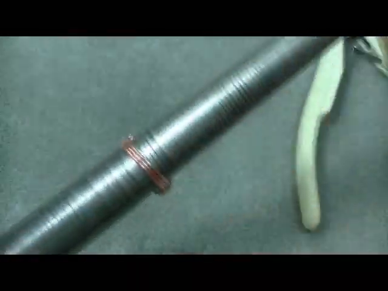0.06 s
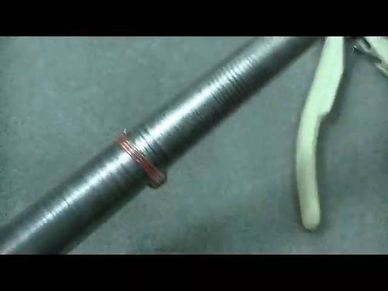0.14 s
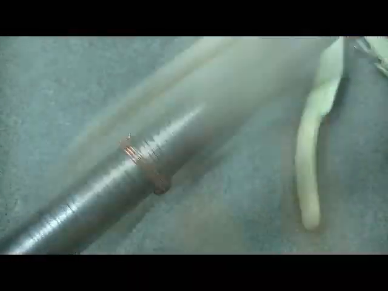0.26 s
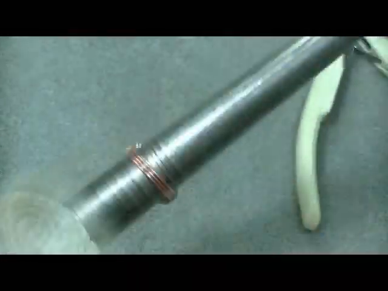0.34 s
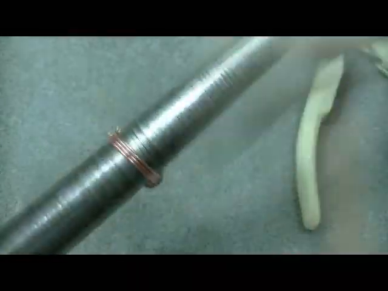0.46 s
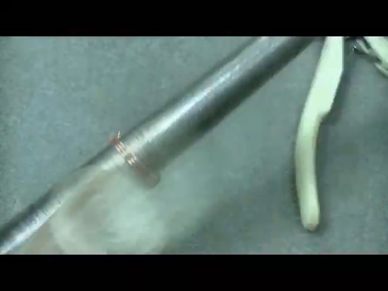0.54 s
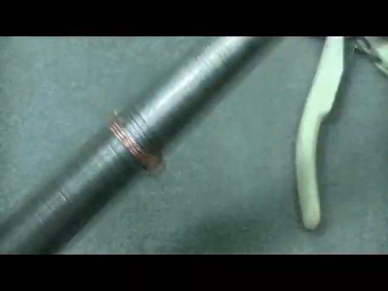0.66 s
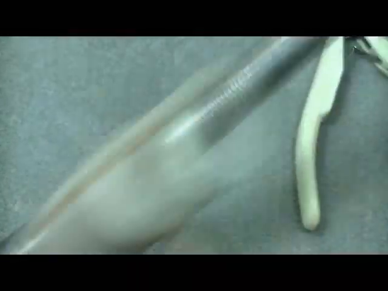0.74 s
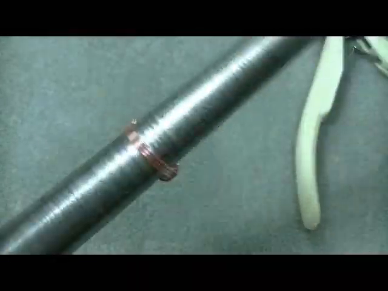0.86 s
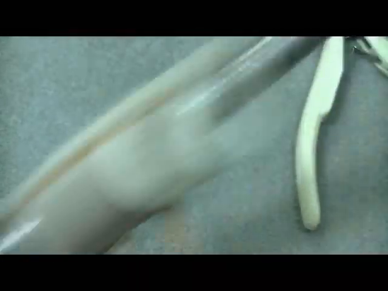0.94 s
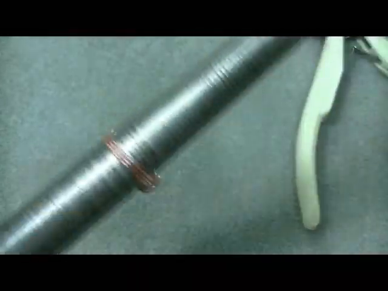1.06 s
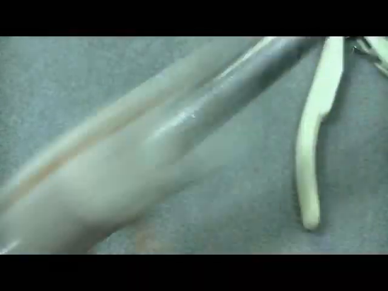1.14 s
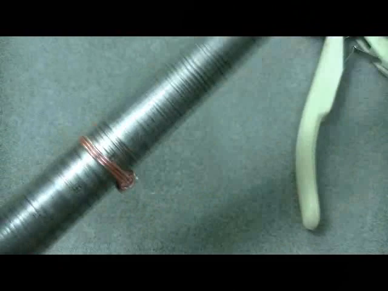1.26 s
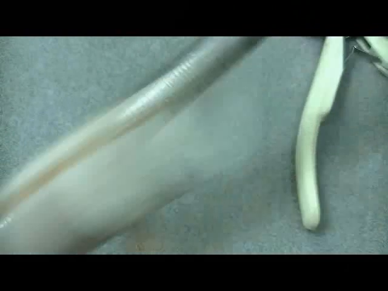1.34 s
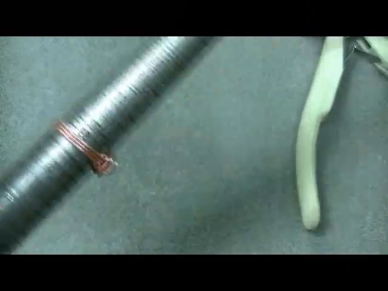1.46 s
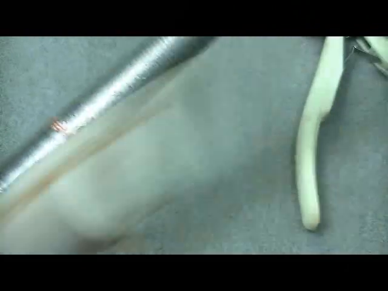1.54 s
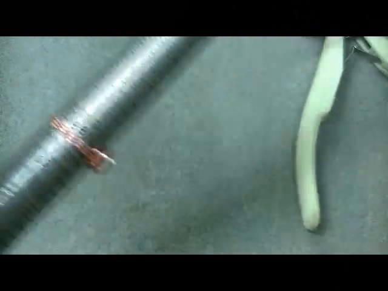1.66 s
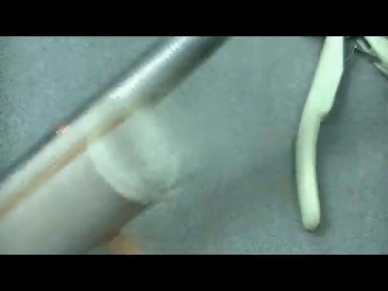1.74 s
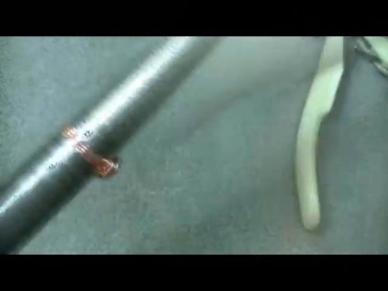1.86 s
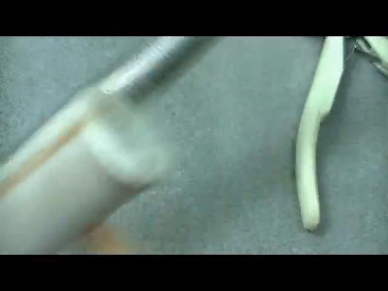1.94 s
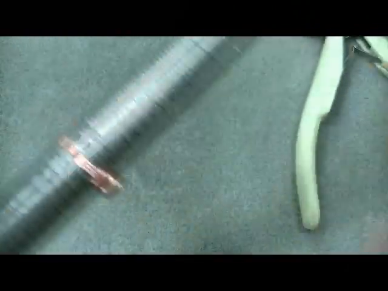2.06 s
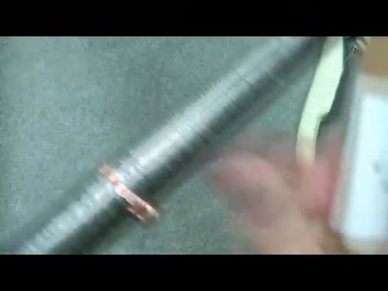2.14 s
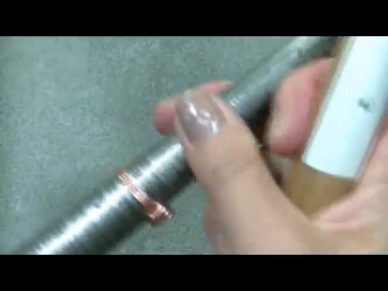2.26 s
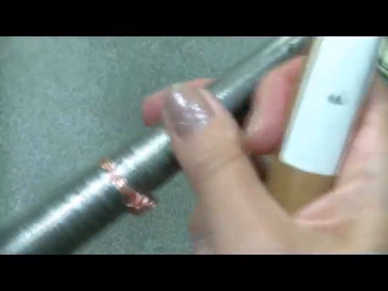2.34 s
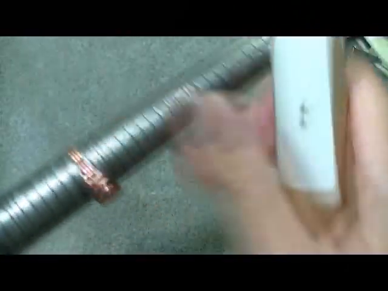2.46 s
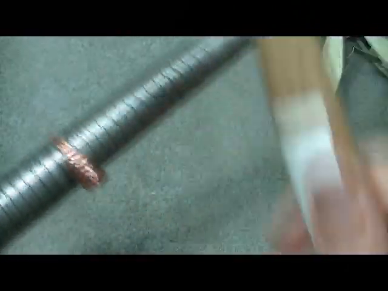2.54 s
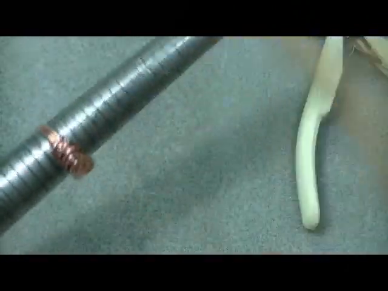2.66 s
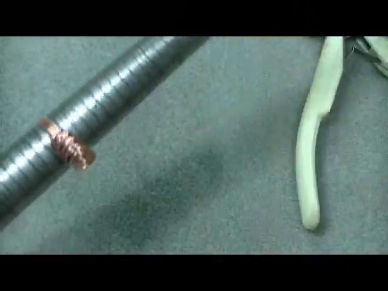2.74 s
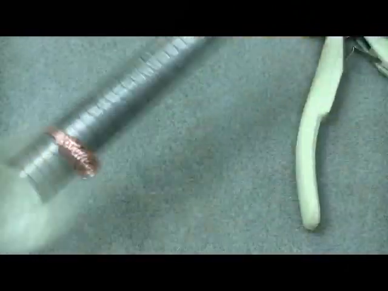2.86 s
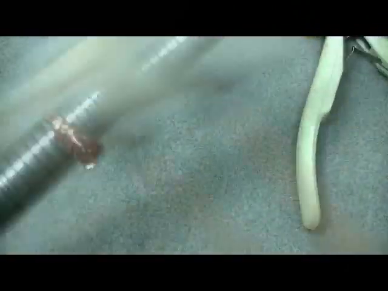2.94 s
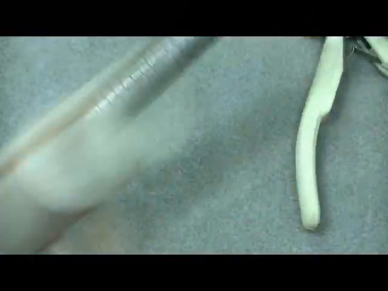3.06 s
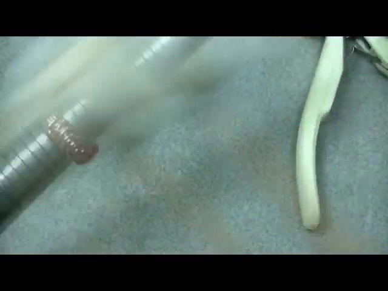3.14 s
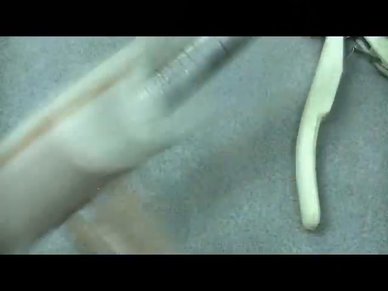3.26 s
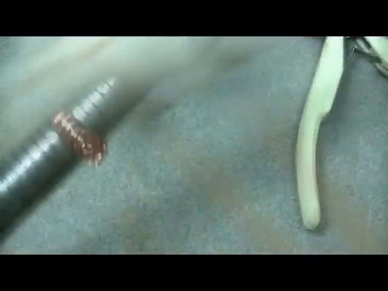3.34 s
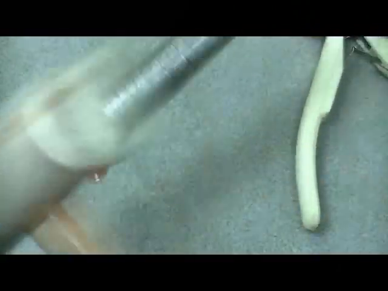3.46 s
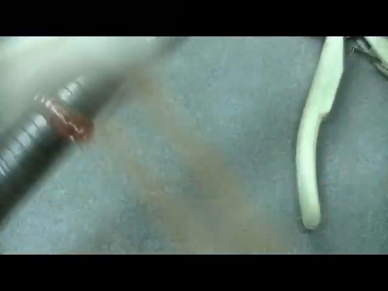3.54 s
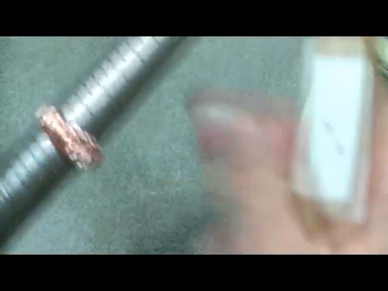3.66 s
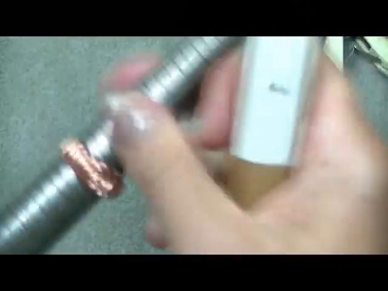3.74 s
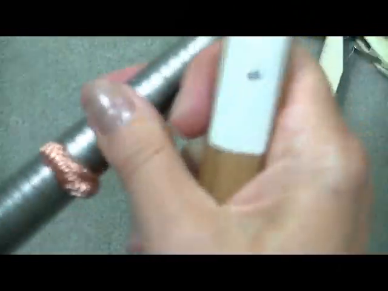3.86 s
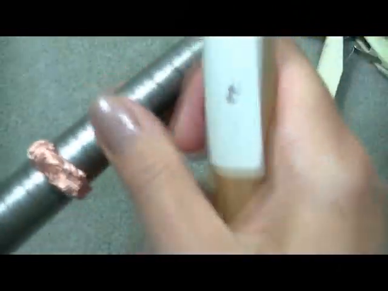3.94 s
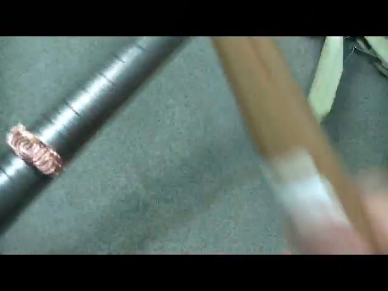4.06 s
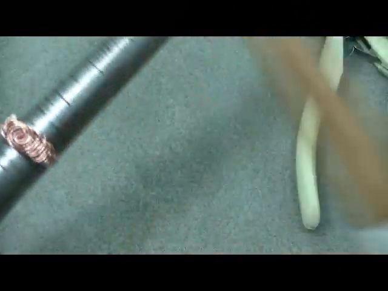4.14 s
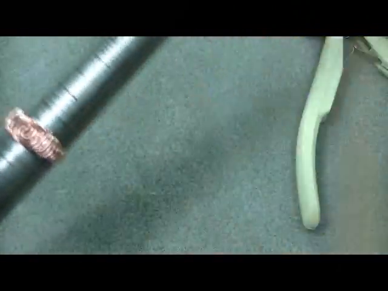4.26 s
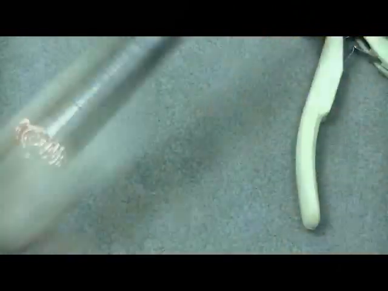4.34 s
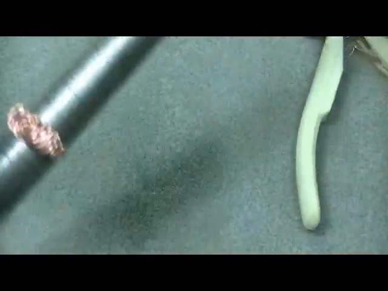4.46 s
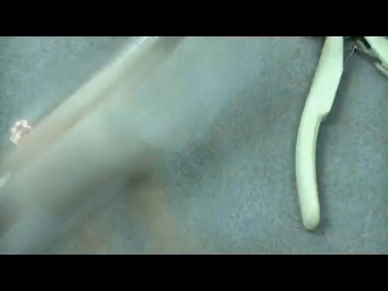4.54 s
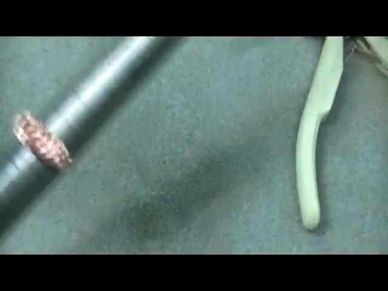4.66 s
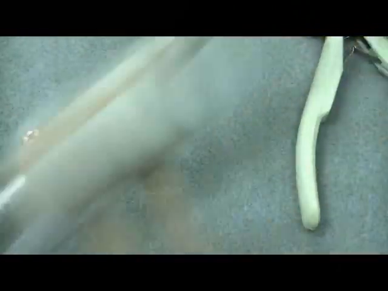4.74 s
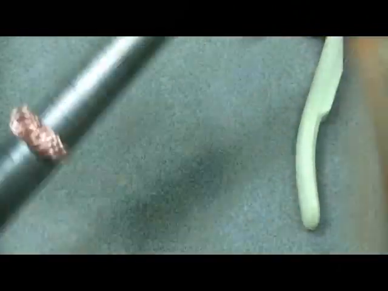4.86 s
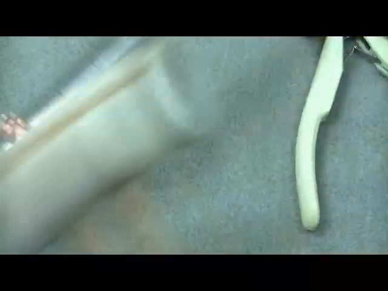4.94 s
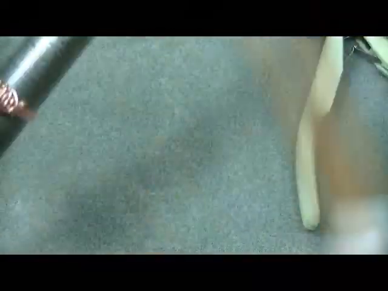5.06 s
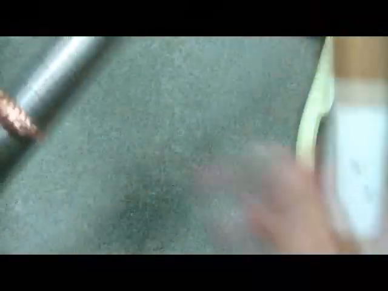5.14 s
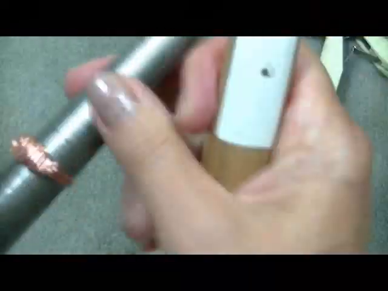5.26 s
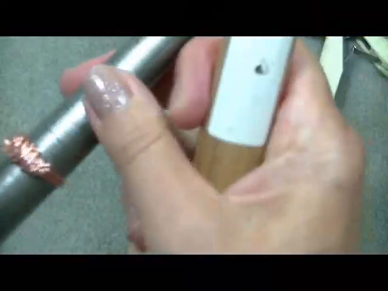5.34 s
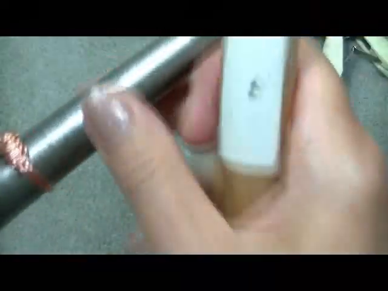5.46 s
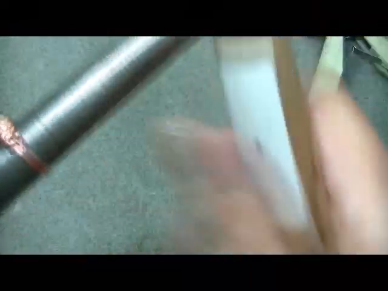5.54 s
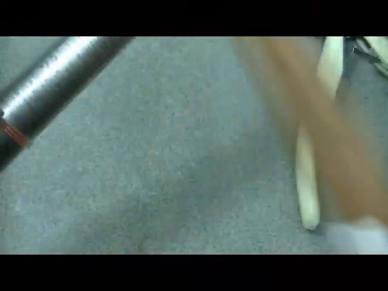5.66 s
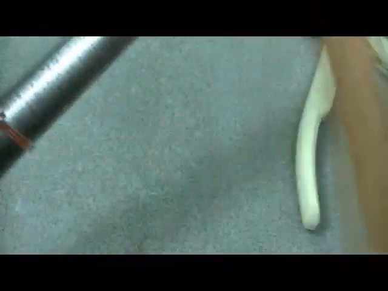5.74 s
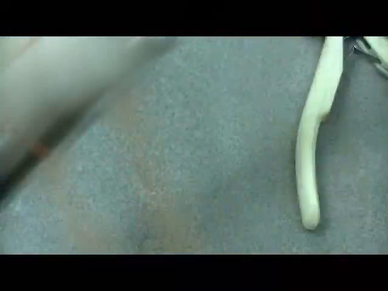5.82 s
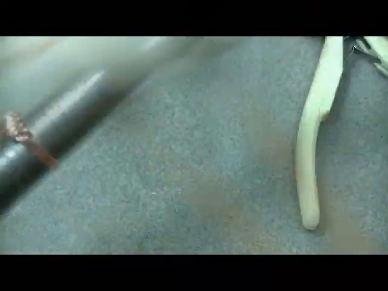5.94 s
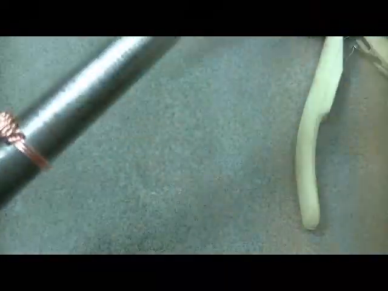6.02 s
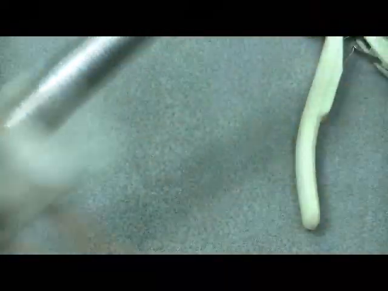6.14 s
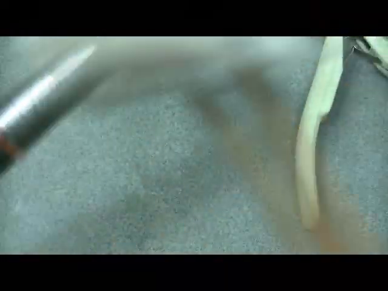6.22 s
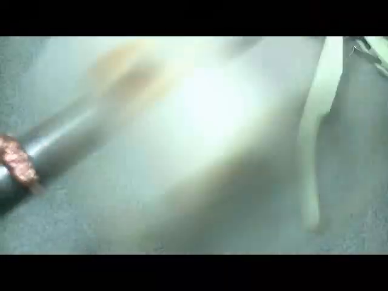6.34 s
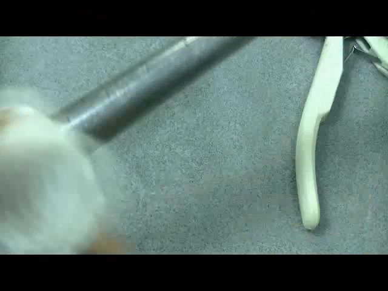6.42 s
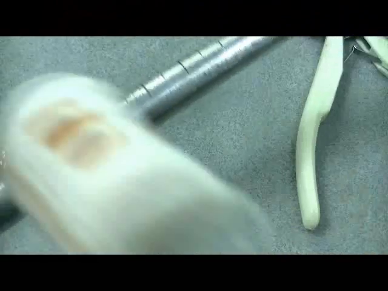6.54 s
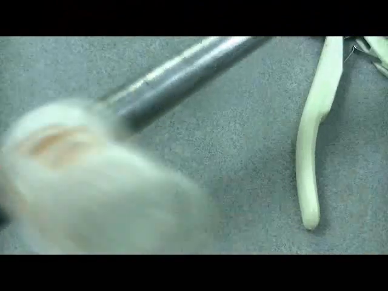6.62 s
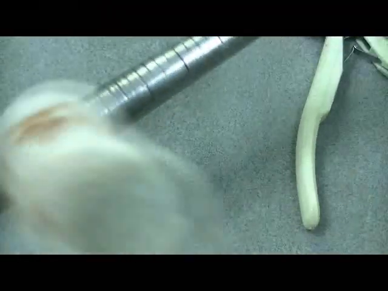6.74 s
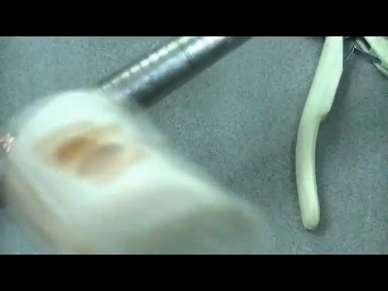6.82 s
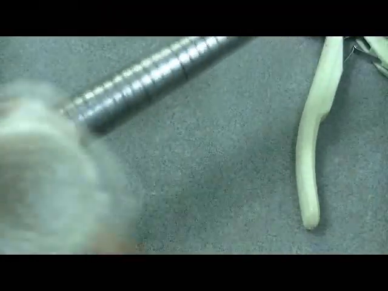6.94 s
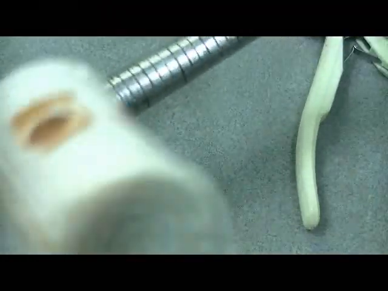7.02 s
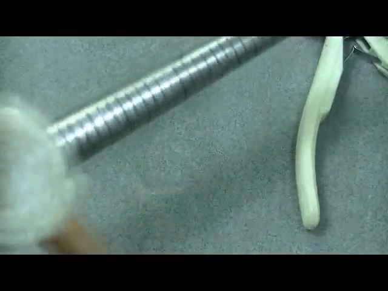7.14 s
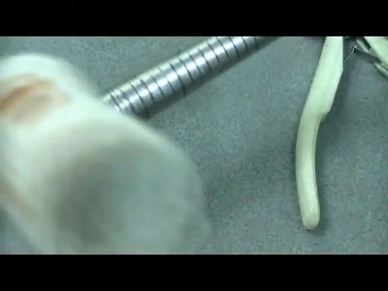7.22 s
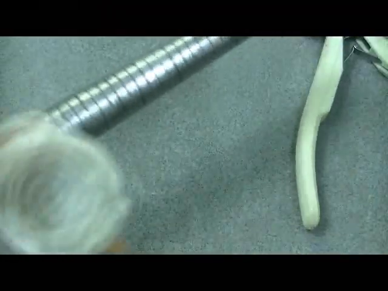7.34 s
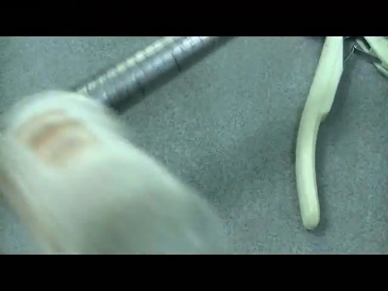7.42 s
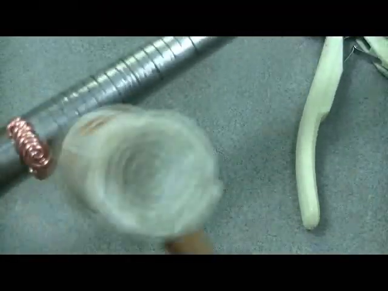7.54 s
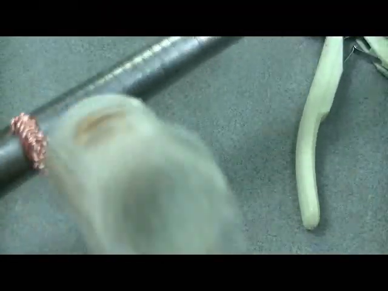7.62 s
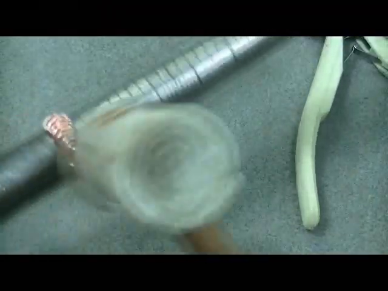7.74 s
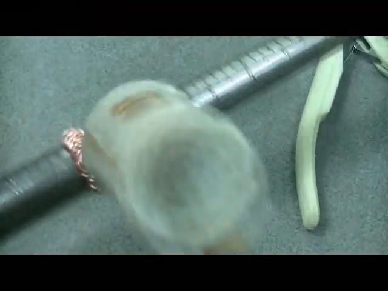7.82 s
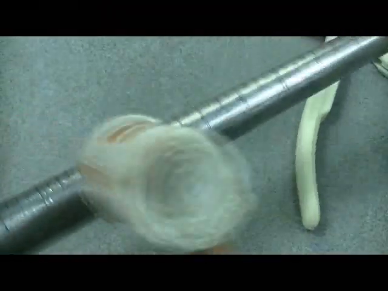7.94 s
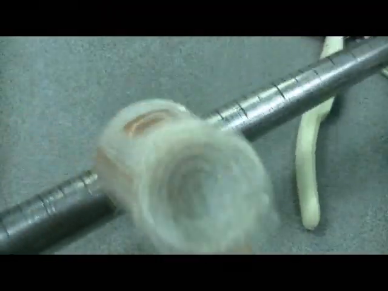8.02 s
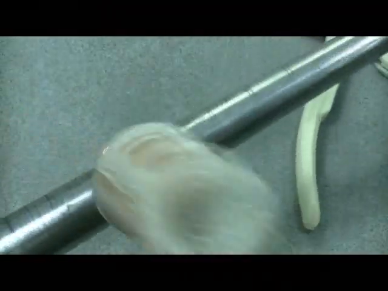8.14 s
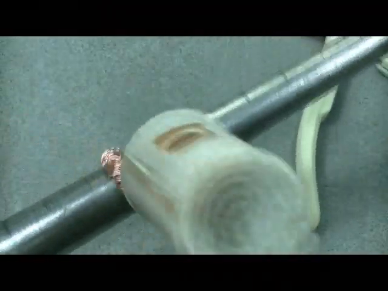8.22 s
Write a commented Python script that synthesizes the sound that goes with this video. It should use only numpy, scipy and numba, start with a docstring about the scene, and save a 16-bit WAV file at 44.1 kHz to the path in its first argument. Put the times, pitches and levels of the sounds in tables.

```python
"""Hammering a ring on a steel rod

A hide mallet drives a copper ring down a hand-held steel rod (a mandrel) in a bare workroom.
Each blow knocks, cracks and makes the rod ring; while its tip is near the bench, it bounces there.
The room echoes for about half a second, over a soft hush of ventilation and hiss.
A limiter turns the sound down at each loud blow and quickly lets it back up."""
import sys
import numpy as np
from scipy import signal
from scipy.fft import rfft, irfft, next_fast_len
from scipy.io import wavfile
from numba import njit

SR = 44100
rng = np.random.default_rng(int(sys.argv[2]) if len(sys.argv) > 2 else 0)


def log_audio(samples):
    """Write samples as a 16-bit WAV file to the path given in sys.argv[1]."""
    # one column per channel
    frames = np.atleast_2d(samples).T
    # limit to full scale, then quantise
    limited = np.clip(frames, -1, 1)
    pcm = np.round(limited * 32767).astype(np.int16)
    wavfile.write(sys.argv[1], SR, pcm)


N = 365148

# The tone colour of the background hush: pitch_hz, relative_db
HUSH_COLOUR = [(15, -74), (25, -28), (48, -3), (70, -33), (86, -9.5), (106, -6.5), (175, -10), (282, -1.5),
               (313, -11), (745, -12), (807, -11.5), (996, -16.5), (13500, -33.5)]
# How wide the hush is (side is what differs between the ears, mid is what they share):
# pitch_hz, side_minus_mid_db
HUSH_WIDTH = [(60, -0.5), (230, -4), (880, -1), (3390, -2.5), (13000, -3)]
# Faint ticks as the hands shift the ring: start_s, level_db
HAND_TICKS = [(0.0883, -38), (2.718, -66), (5.214, -37), (5.2992, -46), (5.35, -45), (5.471, -39)]
# Mallet blows: start_s, knock_db, crack_db, ringing_db (compared with an average blow)
MALLET_BLOWS = [(0.376, 8.5, -1, 4.5), (0.5926, 5.5, -0.5, .5), (0.8113, 4, -2, -2.5),
                (1.007, 7, -2.5, 2.5), (1.209, 7.1, -2, 1), (1.409, 4, -2.5, -2.5),
                (1.6032, 2.3, 1.5, -6.5), (1.802, 4, 2.5, -1.5), (1.9814, 5, 2, -3), (2.9337, 10, 3, 8.5),
                (3.141, 7.1, -1, -3), (3.3433, 8.5, 1, 1.5), (3.532, 7.8, 2, .5), (4.411, 10, 2, 8),
                (4.6266, 6.5, 2.5, 1.5), (4.8276, 6, 1.5, 3), (5.01, 2.2, 0, -5.5), (5.9067, 1.5, -3, -5),
                (6.1337, 3.5, -4, 6), (6.5269, 8.5, 3, 11), (6.7499, 4.5, 0, 1), (6.9697, 5.5, 0, -1),
                (7.1906, 6.5, -5.5, -3), (7.4072, 6, -2, -3.5), (7.6186, 4, 1.5, -2), (7.8296, 4.5, -1, 1),
                (8.0484, 3.5, -7, -7), (8.2668, 7.5, 0.5, 2)]
# The short tones in a mallet knock: pitch_hz, level_db, fade_s (time to fall by 60 dB)
MALLET_TONES = [(360, -12, 0.0053), (933, -1.5, 0.0076), (1163, -1, 0.006), (1833, 2, 0.004),
                (2380, -2.5, 0.0029), (4000, -22, 0.0018)]
# The five tones the rod makes as it bends to and fro: level_db, fade_s
ROD_TONES = [(-14.5, 0.44), (-5.5, 0.22), (-0.5, 0.14), (-3, 0.15), (-18, 0.28)]
# The pitch of each rod tone divided by that of the second: pitch_ratio
ROD_RATIOS = [.4, 1, 1.86, 2.948, 4.2]
# The grip and the ring's seat split each rod tone into two close pitches, here for the second tone:
# start_s, lower_hz, upper_hz
RING_SEATS = [(0, 2727, 2760), (2.5, 2721, 2736), (4.2, 2745, 2764), (5.6, 2722, 2752), (6.4, 2731, 2762)]
# How the rod rings in each seat: tone1_db, tone2_db, tone3_db, tone4_db, upper_share (0 to 1)
SEAT_LEVELS = [(-13.5, -12, -28, -37.5, 1), (-12, -8, -28, -37, 0.53), (-13.5, -12.5, -24, -38.5, 0.5),
               (-14.5, -18, -31, -39, 0.94), (-4.5, -17, -35, -28.5, 1)]
# How much rod tones 1-4 follow a blow's ringing_db: db_per_db
TONE_FOLLOW = [0.23, 1.0, 0.44, .6]
# How much rod tones 1-4 vary by chance from blow to blow: spread_db
TONE_SCATTER_DB = [2.0, 0.49, 2.5, 3.0]
# The rod's tip bounces on the bench: start_s, knock_db, gap_ms (to a second touch, only if over 1)
TIP_BOUNCES = [(0.4029, -6, -1), (0.4354, -17.5, 0.5), (0.6066, -11, 7), (0.6297, -9.5, 5),
               (0.826, -13.5, 3.5), (0.8548, -14.5, 0), (1.0212, -12.5, 5.9), (1.0495, -12, -0.5),
               (1.222, -13.5, 5), (1.2515, -11, -0.5), (1.4236, -11.5, 8), (1.6123, -12.5, 0.5),
               (1.6198, -14.5, 5.5), (1.8118, -12, 7), (1.839, -12, -0.5), (1.9899, -6.5, 0),
               (2.0059, -15, 0), (2.0229, -9, 1), (2.9618, -4, 0), (3.1746, -8, 8.5), (3.3562, -13.5, 0.5),
               (3.3797, -9, 13.5), (3.5447, -14, -1), (3.5641, -8.5, 7.5), (4.4326, -11, 1),
               (4.4463, -9.5, 9), (4.6407, -12.5, 0), (4.6631, -8.5, 7), (4.837, -9, 0), (4.8604, -7, 7),
               (5.018, -8.5, 10.5), (5.054, -9, 7.5), (5.9195, -13, 0), (5.9386, -15.5, 8),
               (6.1453, -10, 7.5), (6.1724, -10, 13.5)]
# The short tones of the bench: pitch_hz, level_db, fade_s
BENCH_TONES = [(210, -24, .05), (428, -20, .1), (507, -19, .12), (820, -0.5, .012), (1120, 4, .011),
               (1900, -1, .006), (3000, -6, .005)]
# One low thud of the bench top: start_s, level_db, pitch_hz, fade_s
BENCH_THUD = (.626, -27, 200, .13)
# The room's echo from bass to treble: pitch_hz, level_db, fade_s, side_minus_mid_db
ROOM_ECHO = [(60, -54.5, 0.26, 27), (180, -63, 0.91, -11.5), (400, -31.5, 0.34, -25.5),
             (860, -37, 0.61, -13), (1550, -39, 0.63, -8), (2900, -39, 0.59, -6.5),
             (5300, -36.5, 0.57, -6.5), (12300, -41, 0.37, -2.5)]


def from_db(db):
    """Turn decibels into a number to multiply by."""
    return 10 ** (np.asarray(db) / 20)


def at_pitch(table, hz):
    """Read a table's columns between its rows, on a scale of octaves."""
    pitches, *columns = np.transpose(table)
    return [np.interp(np.log(hz), np.log(pitches), column) for column in columns]


def band(x, low_hz, high_hz):
    """Soften everything below and above two pitches."""
    return signal.sosfilt(signal.butter(2, [low_hz, high_hz], "band", fs=SR, output="sos"), x)


def stereo(mid, side):
    """Left is mid plus side; right is mid minus side."""
    return np.array([mid + side, mid - side])


def clicks(times, gains):
    """A one-sample click at each time."""
    out = np.full(N, 1e-18)
    np.add.at(out, np.round(np.asarray(times) * SR).astype(int), gains)
    return out


def hush(level_db=-56.5):
    """Ventilation murmur and microphone hiss make a steady noise."""
    size = next_fast_len(N)
    hz = np.maximum(np.arange(size // 2 + 1) * SR / size, 1)
    mid_db, width_db = at_pitch(HUSH_COLOUR, hz)[0], at_pitch(HUSH_WIDTH, hz)[0]
    spectrum = rfft(rng.standard_normal((2, size))) * from_db([mid_db, mid_db + width_db])
    mid, side = irfft(spectrum, size)[:, :N]
    return from_db(level_db) * stereo(mid, side) / np.std(mid)


def crack(times, level_db, fade_s, low_hz, high_hz, far_db=0, side_db=-12.0):
    """Each contact gives a bright burst of noise nearby and a plain click for the walls."""
    hits = clicks(times, from_db(level_db))
    fade = signal.lfilter([1], [1, -from_db(-60 / (fade_s * SR))], hits)
    mid, side = rng.standard_normal((2, N))
    near = fade * stereo(mid, from_db(side_db) * side)
    return band(near, low_hz, high_hz), band(hits * from_db(far_db), low_hz, high_hz)


def hand_ticks():
    """The ring ticks faintly as the hands shift it."""
    times, level_db = np.transpose(HAND_TICKS)
    near, _ = crack(times, level_db, fade_s=0.0054, low_hz=3030, high_hz=11100)
    return near


def struck_tone(hits, hz, fade_s):
    """Each click starts a pure tone that dies away."""
    decay, angle = from_db(-60 / (fade_s * SR)), 2 * np.pi * hz / SR
    return signal.lfilter([0, np.sin(angle)], [1, -2 * decay * np.cos(angle), decay * decay], hits)


def knock(times, strength_db, tones, scatter_db):
    """A hit starts all of an object's short tones, in a slightly different mix each time."""
    chance = rng.standard_normal((len(times), len(tones)))
    out = 0
    for k, (hz, level_db, fade_s) in enumerate(tones):
        hits = clicks(times, from_db(strength_db + level_db + scatter_db * chance[:, k]))
        out -= (-1) ** k * struck_tone(hits, hz, fade_s)   # neighbouring tones swing opposite ways
    return out


def mallet():
    """The hide head knocks and the copper cracks. Gives the sound nearby and the sound for the walls."""
    times, knock_db, crack_db, _ = np.transpose(MALLET_BLOWS)
    near, far = crack(times, crack_db, fade_s=0.013, low_hz=2220, high_hz=7950, far_db=16.5)
    near += knock(times, knock_db, MALLET_TONES, scatter_db=4.0)
    far += knock(times, knock_db, MALLET_TONES, scatter_db=0.5)   # the walls average all directions
    return near, far


def wobble(rate_hz):
    """A smooth random wander, about 1 in size."""
    keep = np.exp(-2 * np.pi * rate_hz / SR)
    wander = signal.lfilter([1], [1, -2 * keep, keep * keep], rng.standard_normal(N))
    return wander / np.std(wander)


def steel_rod(sway_hz=45.4, sway_db=(6.0, 5.0, 5.0, 4.0, 4.0), share_scatter=0.22):
    """The struck rod rings in five pairs of close pitches; each blow stops the old ringing."""
    tones = np.zeros((len(ROD_TONES), N))
    starts = [round(blow[0] * SR) for blow in MALLET_BLOWS]
    for start, stop, (start_s, _, _, ringing_db) in zip(starts, starts[1:] + [N], MALLET_BLOWS):
        t = np.arange(stop - start) / SR
        seat = sum(row[0] <= start_s for row in RING_SEATS) - 1
        _, lower_hz, upper_hz = RING_SEATS[seat]
        *seat_db, upper_share = SEAT_LEVELS[seat]
        *chance, turn = rng.standard_normal(len(ROD_TONES))
        # how the rod is turned shares out the energy within each pair
        upper_share = np.clip(upper_share + share_scatter * turn, 0, 1)
        struck_db = seat_db + np.multiply(TONE_FOLLOW, ringing_db) + np.multiply(TONE_SCATTER_DB, chance)
        struck_db = np.append(struck_db, struck_db[-1])   # the fifth tone follows the fourth
        for k, (ratio, (level_db, fade_s)) in enumerate(zip(ROD_RATIOS, ROD_TONES)):
            lower, upper = (np.sin(2 * np.pi * ratio * hz * t) for hz in (lower_hz, upper_hz))
            pair = np.sqrt(1 - upper_share) * lower + np.sqrt(upper_share) * upper
            tones[k, start:stop] = pair * from_db(struck_db[k] + level_db - 60 * t / fade_s)
    # the rod sways in the hand, so each tone wavers in its own way
    return sum(tone * from_db(db * wobble(sway_hz)) for tone, db in zip(tones, sway_db))


def tip_touches(early_s=0.02):
    """The tip touches the bench once or twice per bounce. Gives times, knock_db, crack_db."""
    times, knock_db, gap_ms = np.transpose(TIP_BOUNCES)
    blows = np.transpose(MALLET_BLOWS)
    blow_s, blow_knock_db, blow_crack_db, _ = blows[:, np.searchsorted(blows[0], times) - 1]
    crack_db = knock_db + 1 + 0.91 * (blow_crack_db - blow_knock_db)   # sharp blow, sharp bounce
    # a second touch is sharp after an early bounce and dull after a late one
    early = times - blow_s < early_s
    second = np.array([times + gap_ms / 1000,
                       knock_db + np.where(early, -0.5, -7.0),
                       crack_db + np.where(early, 6.5, -7.5)])
    return np.hstack([[times, knock_db, crack_db], second[:, gap_ms > 1]])


def bench():
    """The steel tip slaps the bench. Gives the sound nearby and the sound for the walls."""
    times, knock_db, crack_db = tip_touches()
    board = knock(times, knock_db, BENCH_TONES, scatter_db=1.5)
    near, far = crack(times, crack_db, fade_s=0.0083, low_hz=2190, high_hz=10000, far_db=3.5)
    thud_s, thud_db, thud_hz, thud_fade_s = BENCH_THUD
    thud = struck_tone(clicks([thud_s], from_db(thud_db)), thud_hz, thud_fade_s)
    return board + near + thud, from_db(-5.5) * board + from_db(-4.0) * far


def room(sound, build_s=0.015):
    """Echoes from the walls build up quickly, then each band of pitches fades at its own speed."""
    t = np.arange(int(0.8 * SR)) / SR
    edges_hz = 22 * 2 ** np.arange(0, 9.6, 0.5)   # half an octave apart
    noise = rng.standard_normal((2, 2, len(t)))
    echo = 0
    for k, (low_hz, high_hz) in enumerate(zip(edges_hz, edges_hz[1:])):
        mid, side = band(noise[k % 2], low_hz, high_hz)   # neighbouring bands get unrelated noise
        level_db, fade_s, side_db = at_pitch(ROOM_ECHO, np.sqrt(low_hz * high_hz))
        echo += from_db(level_db - 60 * t / fade_s) * stereo(mid, from_db(side_db) * side)
    echo *= 1 - np.exp(-(t / build_s) ** 2)
    return signal.fftconvolve(sound[None], echo, axes=1)[:, :N]


def scene():
    """Add up the hammering nearby, its echo and the quiet background."""
    ticks, steel = hand_ticks(), steel_rod()
    blows, blows_far = mallet()
    slaps, slaps_far = bench()
    work = ticks + blows + steel + slaps + room(blows_far + steel + slaps_far)
    bass_cut = signal.butter(2, 140, "high", fs=SR, output="sos")   # small objects give off little bass
    return signal.sosfilt(bass_cut, work) + hush()


@njit
def limiter_cut(over_db, attack_s, release_s):
    """How many dB to turn down: the cut grows fast when the sound is too loud, then eases off."""
    cut_db, now_db = np.empty_like(over_db), 0.0
    for i in range(len(over_db)):
        response_s = attack_s if over_db[i] > now_db else release_s
        now_db += (over_db[i] - now_db) / (response_s * SR)
        cut_db[i] = now_db
    return cut_db


def record(dry, limit_db=-8.5, ceiling=0.52, cutoff_hz=13300):
    """Turn both channels down at loud moments, round off the peaks and cut the highest treble."""
    peak_db = 20 * np.log10(np.abs(dry).max(axis=0) + 1e-9)
    over_db = np.maximum(peak_db - limit_db, 0)
    limited = dry * from_db(-limiter_cut(over_db, attack_s=0.0015, release_s=0.023))
    rounded = ceiling * np.tanh(limited / ceiling)
    return signal.sosfilt(signal.cheby2(12, 60, cutoff_hz, fs=SR, output="sos"), rounded)


dry = scene()
out = record(dry)
log_audio(out)
```